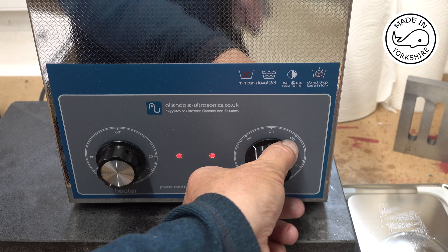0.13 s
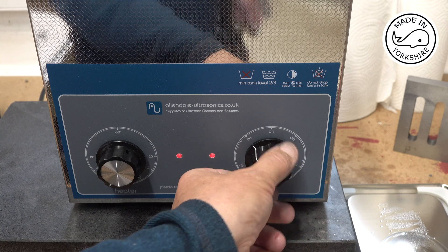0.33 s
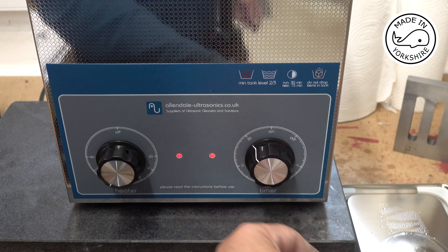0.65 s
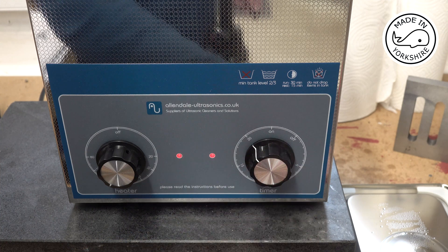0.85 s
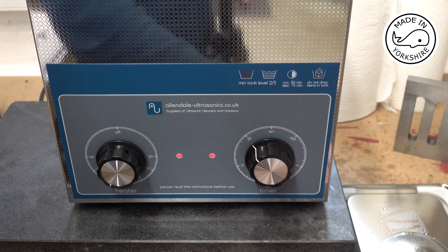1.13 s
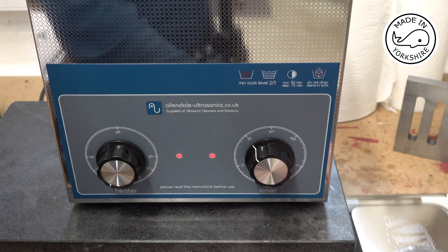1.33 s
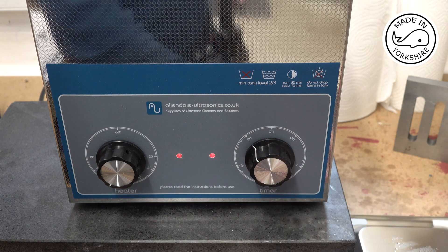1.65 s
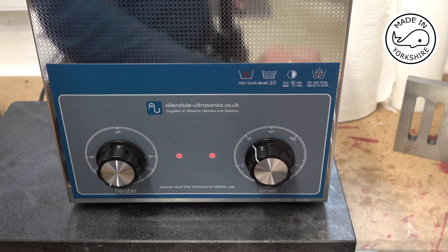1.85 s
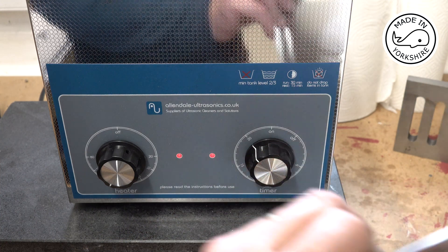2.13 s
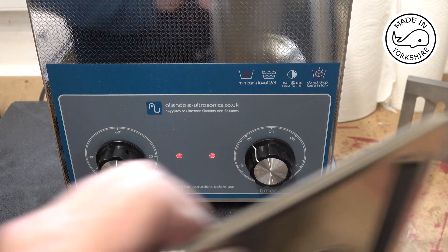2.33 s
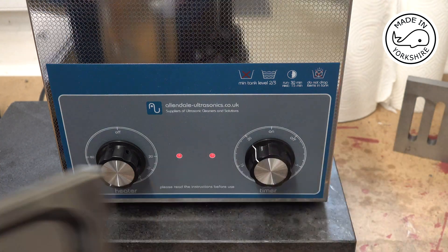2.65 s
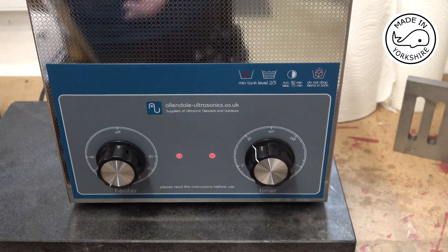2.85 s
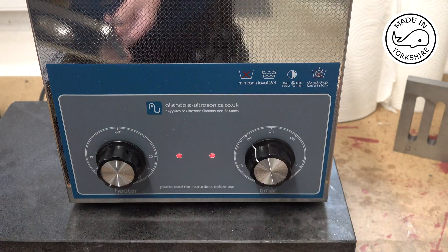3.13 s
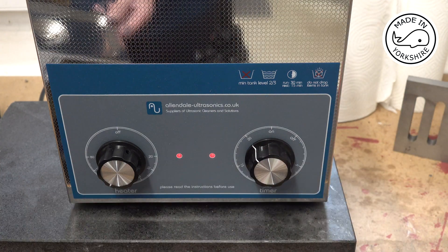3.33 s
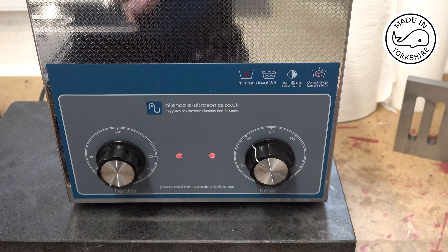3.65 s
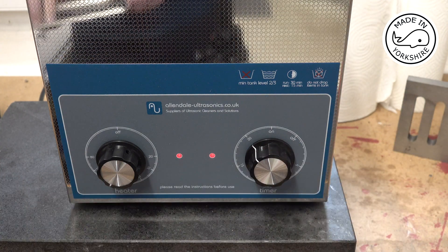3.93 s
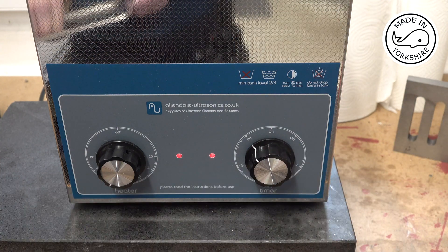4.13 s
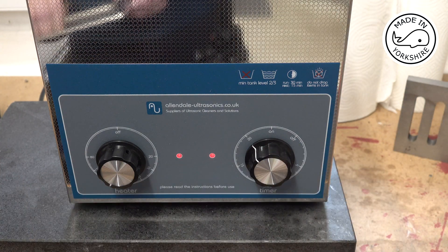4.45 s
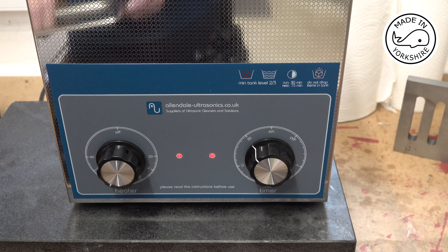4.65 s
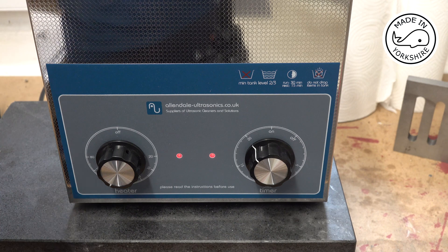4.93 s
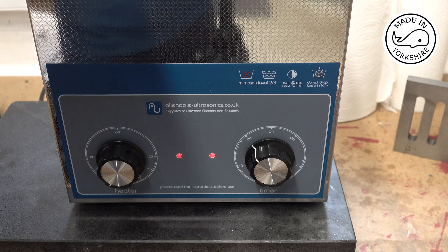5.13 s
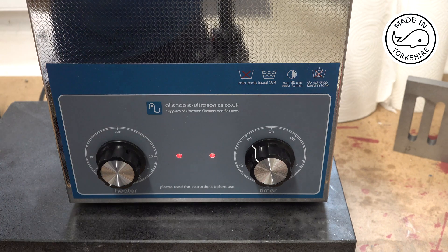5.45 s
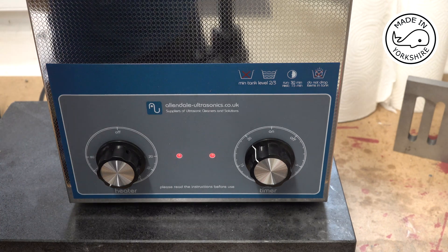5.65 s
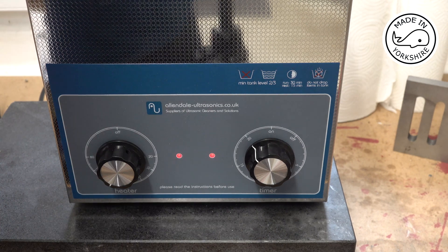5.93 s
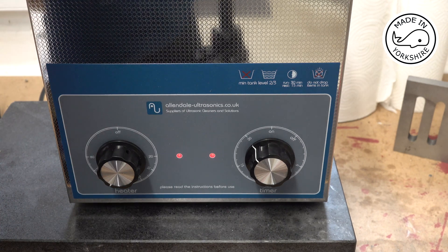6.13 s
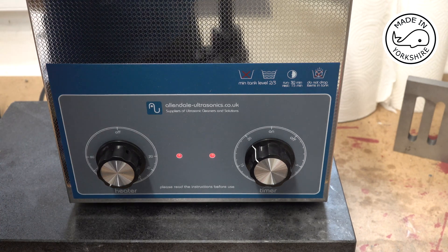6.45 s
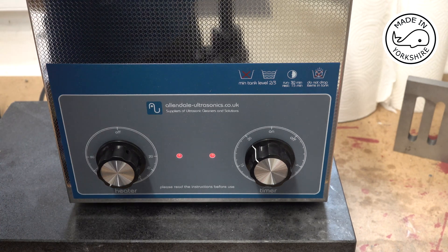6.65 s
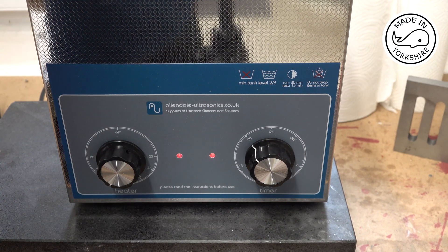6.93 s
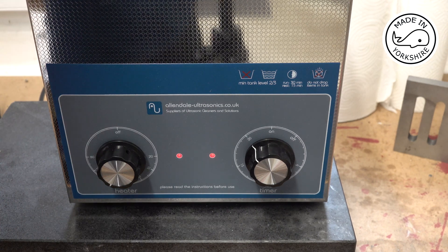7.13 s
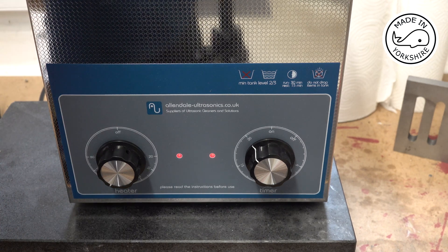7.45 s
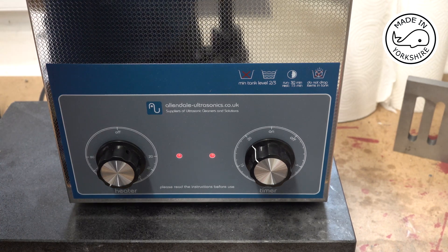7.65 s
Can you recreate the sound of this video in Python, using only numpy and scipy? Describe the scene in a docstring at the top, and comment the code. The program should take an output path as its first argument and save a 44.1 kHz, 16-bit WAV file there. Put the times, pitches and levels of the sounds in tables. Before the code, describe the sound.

Continuous, very high sizzling noise dominates, rough with a fast hundred-per-second pulse, with thin case buzz underneath. A wire basket rattles lightly before being lowered, which damps the squeal. The steadier second half brings low shudders, a dull metallic lid clunk, short scraping strokes, brief buzzing chatter and final small knocks. Close stereo pickup in an indoor workshop, highs slightly stronger on the left.

```python
"""A piercing hiss and squeal pulses over a case buzz: an ultrasonic cleaner running close by in a workshop.
Filtered noise swells on each mains half cycle for the cavitation; sine lines make the buzz and hum.
A steel basket knocks as it is picked up and lowered in: ringing modes, then the hiss drops and throbs.
Later the lid is set on and slid into place: knocks, rubbing noise, a chattering buzz and low shudders."""
import sys
import numpy as np
from scipy import signal
from scipy.fft import rfft, irfft
from scipy.io import wavfile
from scipy.ndimage import uniform_filter1d, minimum_filter1d

SR = 44100
rng = np.random.default_rng(int(sys.argv[2]) if len(sys.argv) > 2 else 0)


def log_audio(samples):
    """Write samples as a 16-bit WAV file to the path given in sys.argv[1]."""
    # one column per channel
    frames = np.atleast_2d(samples).T
    # limit to full scale, then quantise
    limited = np.clip(frames, -1, 1)
    pcm = np.round(limited * 32767).astype(np.int16)
    wavfile.write(sys.argv[1], SR, pcm)


N = 343902

# how far the lid covers the tank: [time_s, cover_share]
LID_COVER = [(5.3, 0), (5.7, 0.45), (6.5, 0.61)]
# levels of the machine's voices: [empty_tank_db, change_under_load_db, change_under_full_lid_db]
SQUEAL_LEVELS = (-12, -4, -0.5)
FIZZ_LEVELS = (-28.5, -3, -5)
WASH_LEVELS = (-39.5, -4.5, 3.5)
BUZZ_LEVELS = (1.5, -1.5, 2)
HUM_LEVELS = (-54, -7, -11)
# broad colour of each part of the hiss: [frequency_hz, relative_level_db]
SQUEAL_COLOUR = [(9000, -50), (11500, -31), (12700, -25), (13700, -19), (14400, -12), (14900, -10),
                 (15200, -14), (15700, -18)]
FIZZ_COLOUR = [(4000, -32.5), (6500, -15), (7200, -17.5), (8400, -10.5), (9400, -7), (10400, -10.5),
               (11500, -11), (14000, -47)]
WASH_COLOUR = [(30, 6), (70, 2.5), (150, 3), (220, 1.5), (320, 4), (600, 0.5), (1200, 1.5), (1700, 6),
               (2200, 2.5), (3300, 2.5), (4500, 6), (6200, 5), (8000, -48), (12000, -34)]
# resonances of tank and water: [centre_hz, width_hz, open_relative_db, lidded_relative_db]
SQUEAL_RESONANCES = [(12050, 260, -22, -28), (12930, 115, -19, -28), (13390, 150, -10, -24),
                     (13845, 155, -8, -13), (14005, 80, -6, -16), (14220, 66, -3, -16),
                     (14370, 45, -3, -16), (14615, 100, 0, 1), (14720, 42, -1, -10), (14830, 55, -7, -2),
                     (14975, 35, -5, -14)]
FIZZ_RESONANCES = [(7060, 54, -9, -20), (7390, 63, 0, -7), (7740, 160, -12, -21), (8030, 154, 2, -6),
                   (8715, 140, 0.5, -2), (11100, 127, -20, -2.5)]
WASH_RESONANCES = [(506, 8.3, -31, 1), (608, 3.8, 10, 15.5), (1020, 9.1, 10, 6), (1450, 53, -11, -16),
                   (1820, 17, 4.5, 8), (1990, 40, 5.5, -15), (2690, 32, 11, 20.5), (3073, 62, 4.5, 16.5),
                   (3583, 15, 17.5, 21.5), (4173, 37, 11.5, 21), (4940, 70, -21, 18), (5330, 18, 14, -9),
                   (6690, 50, 12, -6)]
# lines of the case buzz: [ripple_multiple, relative_level_db]
CASE_LINES = [(5, -65), (7, -65), (15, -55), (16, -63), (17, -69), (18, -54), (19, -69), (20, -63),
              (22, -66), (23, -63), (25, -63), (28, -65), (29, -67), (31, -60), (32, -64), (35, -68),
              (36, -66), (37, -68), (38, -67), (39, -68), (41, -68), (42, -66), (43, -61), (44, -63),
              (45, -65), (46, -60), (48, -64), (49, -64), (51, -61), (53, -64), (56, -66), (59, -64),
              (60, -69), (65, -67), (66, -65)]
# ringing modes of the steel: [pitch_hz, t60_s, relative_level_db]
BASKET_MODES = [(228, 0.19, -3), (440, 0.067, -2), (537, 0.15, -5), (777, 0.2, -10), (1007, 0.084, -2.5),
                (1144, 0.24, -7.5), (1254, 0.14, -10.5), (1490, 0.083, -3), (1670, 0.088, -3),
                (2050, 0.05, 2.5), (2270, 0.11, -5), (2376, 0.11, -3.5), (2900, 0.073, 4.5)]
LID_MODES = [(231, 0.33, -2.5), (360, 0.053, -0.5), (502, 0.18, -7), (597, 0.04, 7), (1008, 0.16, 4.5),
             (1054, 0.063, 5), (1462, 0.11, -0.5), (2880, 0.12, 10.5), (2850, .1, -1), (3500, .08, 2),
             (4170, .08, -3), (4670, .08, -15), (5950, .06, 2)]
# knocks: [start_s, level_db, contact_pitch_hz, rattle_decay_s]
BASKET_BLOWS = [(1.359, -45.5, 584, 0.0093), (1.446, -40.5, 457, 0.025), (1.768, -38.5, 806, 0.015),
                (1.785, -41, 2015, 0.06), (1.812, -38, 1210, 0.021), (1.85, -43.5, 1140, 0.04),
                (1.905, -36, 980, 0.027), (1.935, -40, 368, 0.056), (1.975, -44, 1400, 0.019),
                (2.009, -40, 503, 0.02), (2.055, -38.5, 1464, 0.041), (2.112, -42.5, 536, 0.012),
                (2.122, -41.5, 1960, 0.011), (2.156, -44, 2900, 0.011)]
LID_BLOWS = [(6.225, -47, 616, 0.028), (6.294, -45, 1050, 0.016), (6.445, -46.5, 600, 0.044),
             (6.49, -35.5, 1370, 0.016), (6.494, -55, 2700, 0.029), (6.512, -43, 380, 0.051),
             (6.55, -46.5, 1290, 0.048), (7.179, -50.5, 600, 0.06), (7.683, -41, 600, 0.057),
             (7.69, -44.5, 240, 0.05), (7.765, -39.5, 3100, 0.027)]
# strokes of the sliding lid: [middle_s, half_length_s, rub_level_db, centre_hz, width_hz, rim_ring_share]
LID_STROKES = [(6.33, 0.13, -46, 3950, 900, 0), (6.498, 0.077, -36, 4700, 3500, 0),
               (6.68, 0.055, -37.5, 4270, 2500, 0), (6.88, .055, -38, 5400, 3300, 0.05),
               (7.253, 0.23, -39.5, 3430, 1400, 0.58), (7.39, 0.25, -34.5, 8600, 2600, .2),
               (7.534, 0.14, -35.5, 5600, 1300, 0)]
# resonances of the rubbed rim: [centre_hz, width_hz, relative_level_db]
RIM_RESONANCES = [(2720, 44, -13), (3360, 10, 6), (3530, 27, -4)]
# low shudders: [start_s, level_db]
LOW_SHUDDERS = [(5.82, -44), (6.06, -53), (6.3, -59)]
# lines of the loose lid's chatter: [ripple_multiple, relative_level_db]
LID_LINES = [(5, -1), (6, -2.5), (10, -.5), (27, -4)]
# stereo balance: [frequency_hz, left_minus_right_db]
STEREO_BALANCE = [(1000, .1), (8000, .15), (11000, .4), (13000, 1.1), (14500, 1.65)]

RIPPLE_HZ = 100.154  # one swell per mains half cycle
TOP_HZ = 15760
# the load damps the tank as it is lowered; a share of the damping comes slowly as it settles
LOAD_S, LOWERING_S, SETTLE_S, SETTLE_SHARE = 2.68, .52, 2.2, .3
# shares of the peak drive at which the squealing bubble clouds start and saturate
FLARE_FROM, FLARE_FULL = .35, .7
SWAY_HZ, SWAY_DB = 7, .6
# a hand on the timer knob damps the hum, then lets go
HAND_OFF_S, LET_GO_S, HAND_DB = 0.29, 0.32, -5
SHUDDER_ATTACK_S, SHUDDER_DECAY_S, RUMBLE_DB = 0.034, 0.17, -71
# the lid chatters once it lies on the rim and fades as it is pushed home
LOOSE_S, LOOSE_ATTACK_S, LOOSE_DB = 6.55, .14, -57
SEATED_S, SEATING_DECAY_S = 6.91, 0.4

T = np.arange(N) / SR
HZ = np.maximum(np.arange(N // 2 + 1) * SR / N, 1)
RIPPLE_PHASE = 2 * np.pi * RIPPLE_HZ * T


def undb(db):
    """Decibels to gain."""
    return 10 ** (np.asarray(db) / 20)


def unit(x):
    """Scale to rms 1."""
    return x / np.sqrt(np.mean(x ** 2))


def walk(rate_hz):
    """Smooth random wander around zero with rms 1, from low-passed noise."""
    spectrum = rfft(rng.standard_normal(N))
    return unit(irfft(spectrum / (1 + (HZ / rate_hz) ** 4), N))


def ramp(start_s, length_s):
    """0 before the start, rising evenly to 1."""
    return np.clip((T - start_s) / length_s, 0, 1)


def fade(start_s, decay_s):
    """1 until the start, then an exponential decay."""
    return np.exp(-np.maximum(T - start_s, 0) / decay_s)


def resonance(hz, width_hz):
    """Frequency response of one resonance, gain 1 at its centre."""
    return 1 / (1 + 1j * (HZ ** 2 - hz ** 2) / (HZ * width_hz))


def collapses(drive, spread_db):
    """Dense clicks of collapsing bubbles, of uneven size, as strong as the drive."""
    clicks = rng.standard_normal(N)
    sizes = undb(spread_db * rng.standard_normal(N))
    return drive * clicks * sizes


def covered():
    """Share of the tank under the lid at every sample."""
    return np.interp(T, *np.transpose(LID_COVER))


def loudness(empty_db, loaded_db, lid_db):
    """Gain of one machine voice: the load damps it, then the lid screens it or adds its own ring."""
    lowering = (1 - SETTLE_SHARE) * ramp(LOAD_S, LOWERING_S)
    settling = SETTLE_SHARE * ramp(LOAD_S, SETTLE_S)
    return undb(empty_db + loaded_db * (lowering + settling) + lid_db * covered())


def rumble(hz=25, width_hz=18):
    """Soft shudders over a faint steady rumble: bass noise swells quickly and dies away."""
    bass = unit(irfft(rfft(rng.standard_normal(N)) * resonance(hz, width_hz) ** 2, N))
    level = undb(RUMBLE_DB)
    for start_s, level_db in LOW_SHUDDERS:
        level = level + undb(level_db) * ramp(start_s, SHUDDER_ATTACK_S) * fade(start_s, SHUDDER_DECAY_S)
    return bass * level


def knocks(blows, steel, clack_db, room_t60, breadth):
    """Each blow rattles briefly and rings the steel; the contact decides which modes speak."""
    t = T[:SR]
    out = np.zeros(N + len(t))
    for start_s, level_db, contact_hz, rattle_s in blows:
        ring = 0
        for hz, t60, db in steel:
            ring = ring + undb(db - 60 * t / t60) * np.sin(2 * np.pi * (hz * t + rng.random()))
        clack = undb(clack_db - 60 * t / room_t60) * rng.standard_normal(len(t))
        sparse_hits = rng.standard_normal(len(t)) * (rng.random(len(t)) < .01)
        chatter = sparse_hits * np.exp(-t / rattle_s)
        chatter[0] = 0.92  # the first contact, then the rattle
        blow = signal.fftconvolve(chatter, ring + clack)[:len(t)]
        blow = signal.lfilter(*signal.iirpeak(contact_hz, 1 / breadth, fs=SR), blow)
        start = int(start_s * SR)
        # the level holds over the first 50 ms
        out[start:start + len(t)] += undb(level_db) * blow / np.std(blow[:SR // 20])
    return out[:N]


def basket_knocks():
    """Steel basket picked up from the bench: blows on its ringing modes."""
    return knocks(BASKET_BLOWS, BASKET_MODES, clack_db=3, room_t60=.3, breadth=.45)


def lid_knocks():
    """Lid set down and moved on the tank: blows on its ringing modes."""
    return knocks(LID_BLOWS, LID_MODES, clack_db=7.0, room_t60=0.29, breadth=0.7)


def slides():
    """Lid dragged along the rim: uneven friction swells in one resonance and may ring the rim."""
    out = np.zeros(N)
    friction = rfft(collapses(1, 2.1))
    rim_response = sum(undb(db) * resonance(hz, width) for hz, width, db in RIM_RESONANCES)
    rim = unit(irfft(friction * rim_response, N))
    for middle_s, half_length_s, level_db, hz, width_hz, ring in LID_STROKES:
        rub = unit(irfft(friction * resonance(hz, width_hz), N))
        stroke = np.exp(-2 * ((T - middle_s) / half_length_s) ** 2)
        out += undb(level_db) * (rub + ring * rim) * stroke
    return out


def lid_buzz():
    """Loose lid chattering on the drive: wavering multiples of the ripple, fading as it seats."""
    lines = 0
    for multiple, db in LID_LINES:
        waver = undb(db + 2.5 * walk(12))
        lines = lines + waver * np.sin(multiple * RIPPLE_PHASE + rng.uniform(0, 2 * np.pi))
    loose = ramp(LOOSE_S, LOOSE_ATTACK_S) * fade(SEATED_S, SEATING_DECAY_S)
    return np.sqrt(2) * lines * undb(LOOSE_DB) * loose


def case(waver_db=2.0, muffle_db=-8.5, hum_waver_db=2.4):
    """The pulsing drive buzzes the case on multiples of the ripple; the transformer hums below."""
    wavers = [undb(waver_db * walk(22)) for _ in range(7)]  # shared among the lines in turn
    lines = []
    for i, (multiple, db) in enumerate(CASE_LINES):
        tone = np.sin(multiple * RIPPLE_PHASE + rng.uniform(0, 2 * np.pi))
        lines.append(undb(db) * wavers[i % len(wavers)] * tone)
    # the strongest line comes off the case wall; the lid muffles the others
    wall = lines[np.argmax(np.transpose(CASE_LINES)[1])]
    buzz = wall + (sum(lines) - wall) * undb(muffle_db * covered())
    hand = undb(HAND_DB * (1 - ramp(HAND_OFF_S, LET_GO_S)))
    hum = np.sin(RIPPLE_PHASE) + undb(-6) * np.sin(2 * RIPPLE_PHASE)
    hum = hum * hand * undb(hum_waver_db * walk(2.8))
    return np.sqrt(2) * (buzz * loudness(*BUZZ_LEVELS) + hum * loudness(*HUM_LEVELS))


def colour(x, shape, peaks):
    """Tank and water shape the noise: a broad spectrum with resonances that change under the lid."""
    hz, db = np.transpose(shape)
    power = undb(np.interp(np.log(HZ), np.log(hz), db)) ** 2
    for centre_hz, width_hz, *open_and_lidded_db in peaks:
        gains = undb(open_and_lidded_db)[:, None]
        power = power + np.abs(gains * resonance(centre_hz, width_hz)) ** 2
    bare, lidded = irfft(rfft(x) * np.sqrt(power), N)
    cover = covered()
    return (1 - cover) * unit(bare) + cover * unit(lidded)


def throb():
    """Swaying water detunes the tank: the squeal's level wanders once the load goes in."""
    return undb(SWAY_DB * ramp(LOAD_S, LOWERING_S) * walk(SWAY_HZ))


def cavitation(fizz_rest=0.93, wash_rest=0.99):
    """Bubble clouds flare on each half cycle of the mains and never quite die between."""
    swell = np.abs(np.sin(RIPPLE_PHASE / 2))
    flare = np.clip((swell - FLARE_FROM) / (FLARE_FULL - FLARE_FROM), 0, 1)
    squeal = collapses(.62 + .38 * flare, 1.0)
    fizz = collapses(fizz_rest + (1 - fizz_rest) * swell, 4.2)
    wash = collapses(wash_rest + (1 - wash_rest) * swell, 3.1)
    squeal = colour(squeal, SQUEAL_COLOUR, SQUEAL_RESONANCES) * loudness(*SQUEAL_LEVELS) * throb()
    fizz = colour(fizz, FIZZ_COLOUR, FIZZ_RESONANCES) * loudness(*FIZZ_LEVELS)
    wash = colour(wash, WASH_COLOUR, WASH_RESONANCES) * loudness(*WASH_LEVELS)
    return squeal + fizz * undb(0.77 * walk(24)) + wash * undb(1.16 * walk(22))


def pan(x):
    """Set left against right by frequency: nearly equal at low and middle pitches, left louder up high."""
    left_db = np.interp(HZ, *np.transpose(STEREO_BALANCE))
    return irfft(rfft(x) * undb(np.array([left_db, -left_db]) / 2), N)


def scene():
    """The handling around the running cleaner, and the cleaner itself."""
    handling = rumble() + basket_knocks() + lid_knocks() + slides() + lid_buzz()
    return pan(handling + case() + cavitation())


def record(dry):
    """The recorder cuts the top steeply and briefly holds down peaks that would overload it."""
    low_pass = signal.ellip(12, .1, 85, TOP_HZ, fs=SR, output="sos")
    sound = signal.sosfilt(low_pass, dry)
    safe_gain = np.minimum(1, .98 / (np.abs(sound).max(axis=0) + 1e-9))
    # hold each dip for 129 samples (about 3 ms), then smooth it
    held_gain = minimum_filter1d(safe_gain, size=129)
    return sound * uniform_filter1d(held_gain, size=129)


dry = scene()
out = record(dry)
log_audio(out)
```